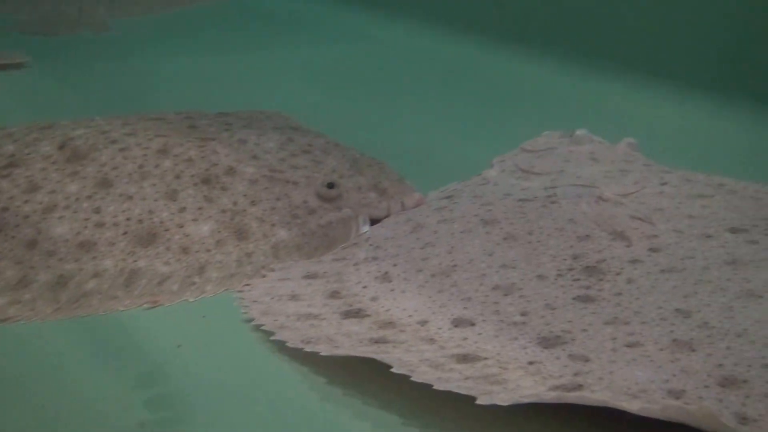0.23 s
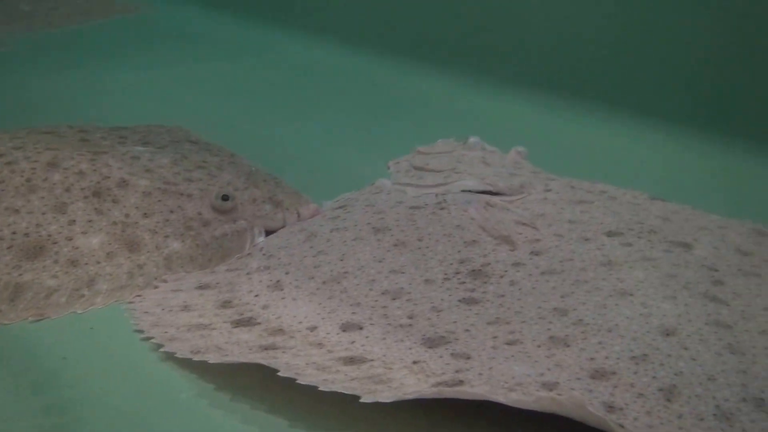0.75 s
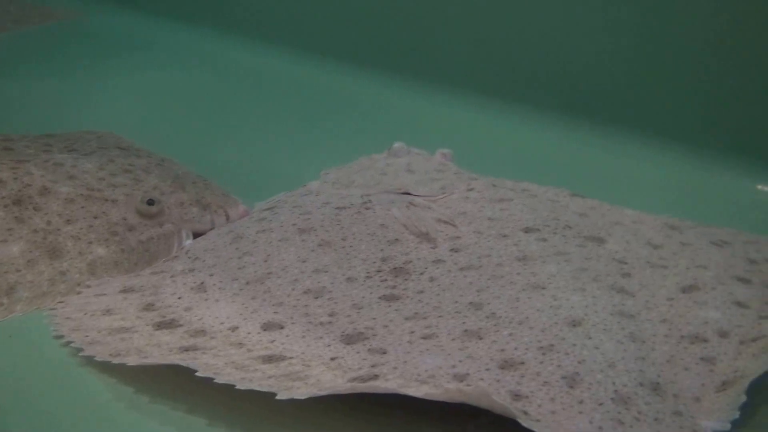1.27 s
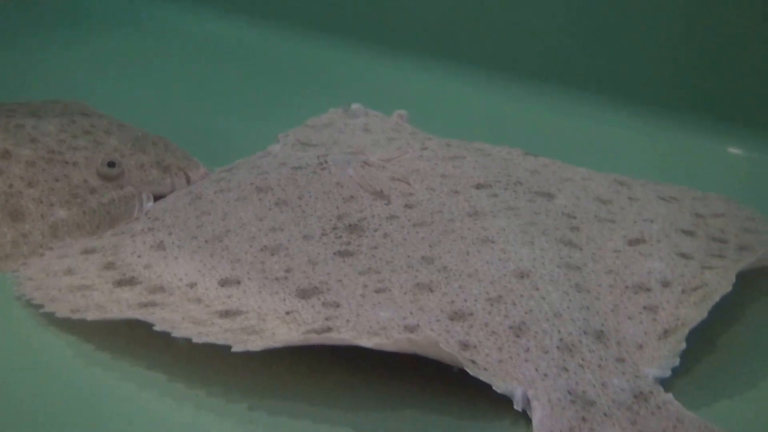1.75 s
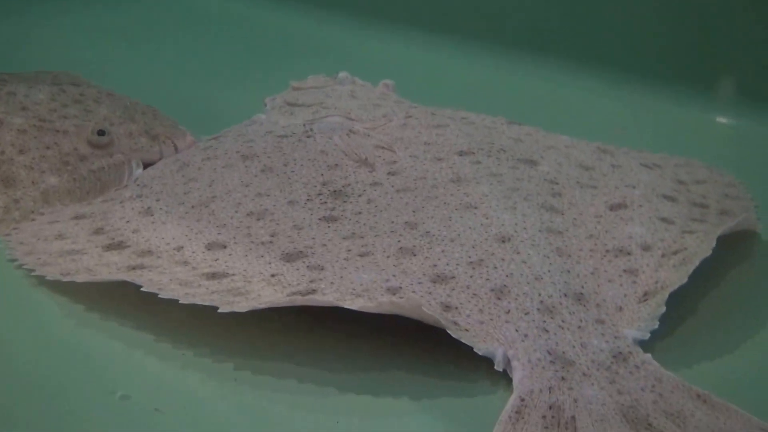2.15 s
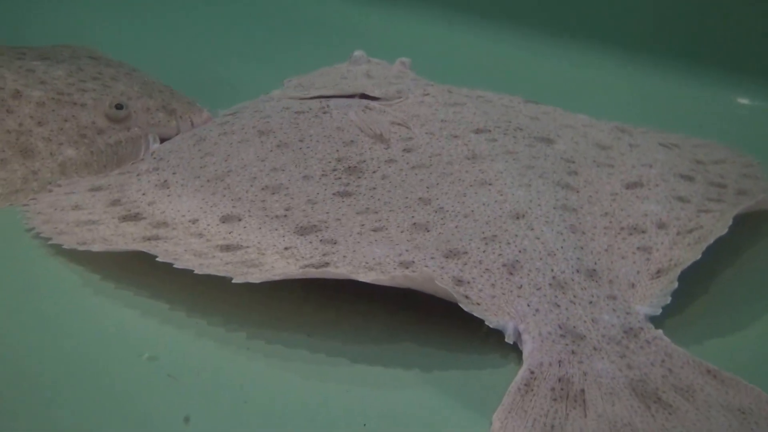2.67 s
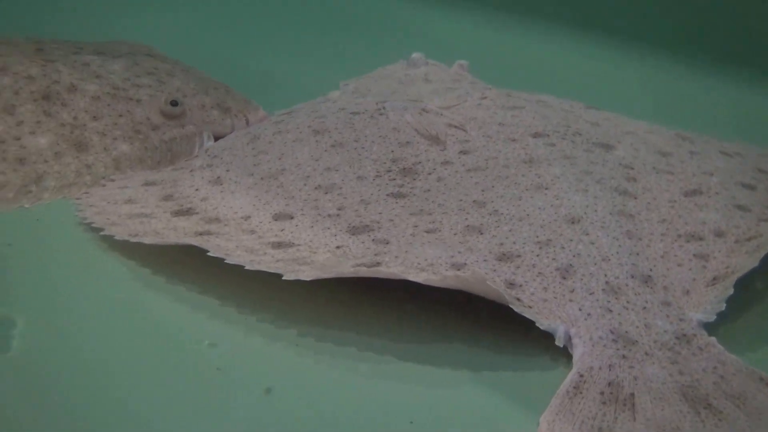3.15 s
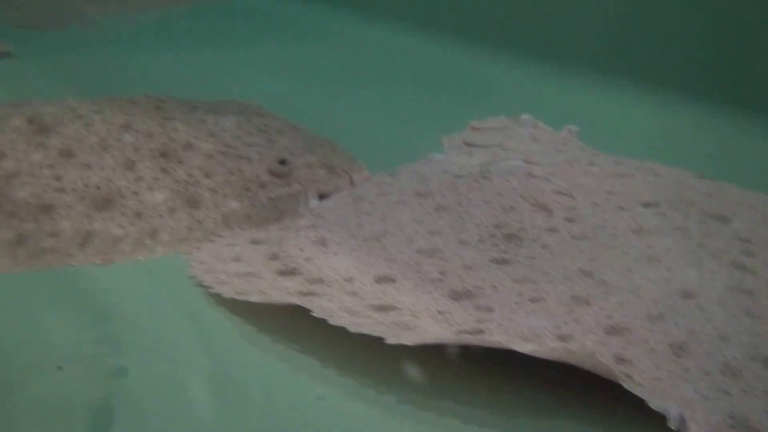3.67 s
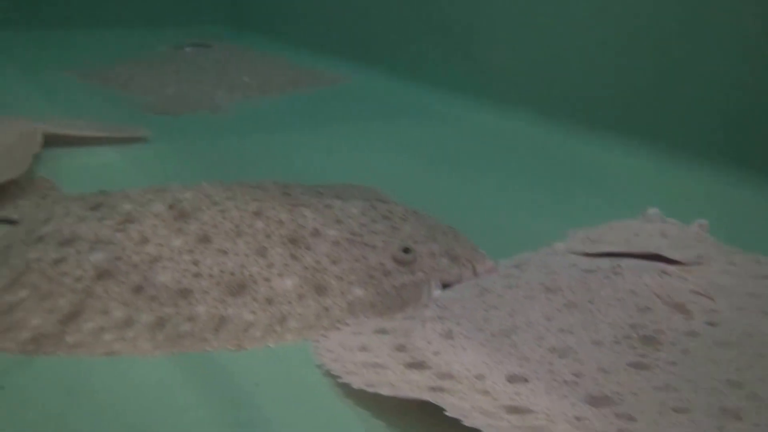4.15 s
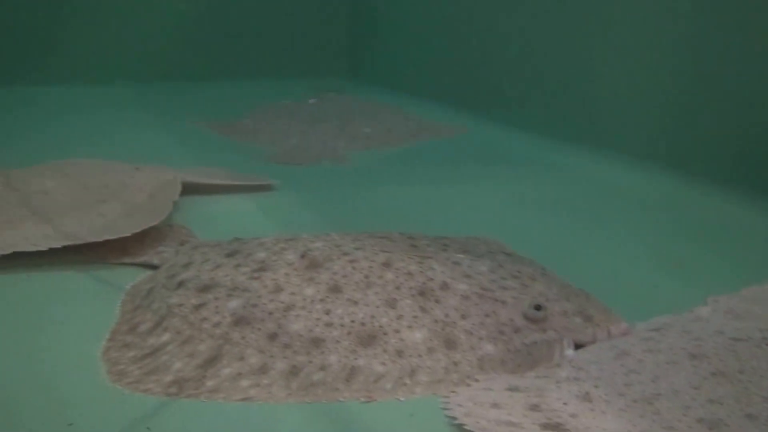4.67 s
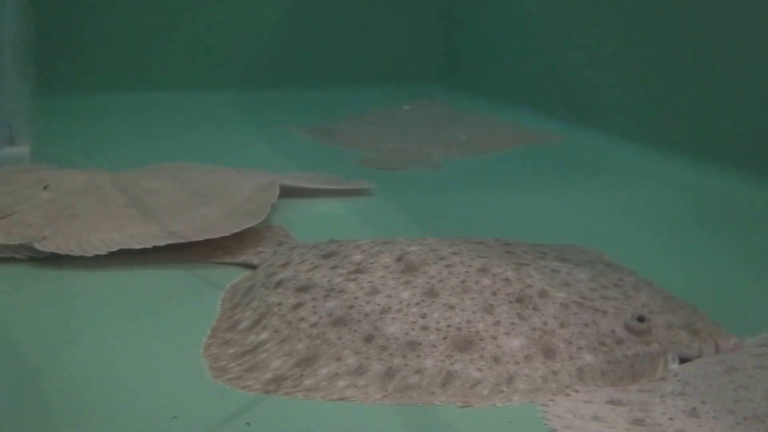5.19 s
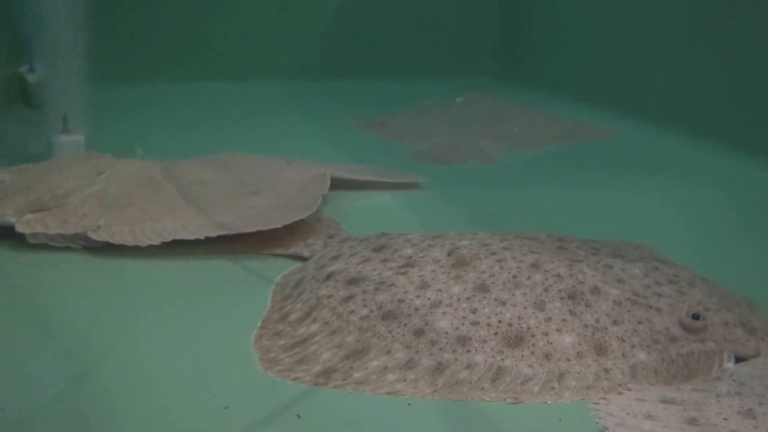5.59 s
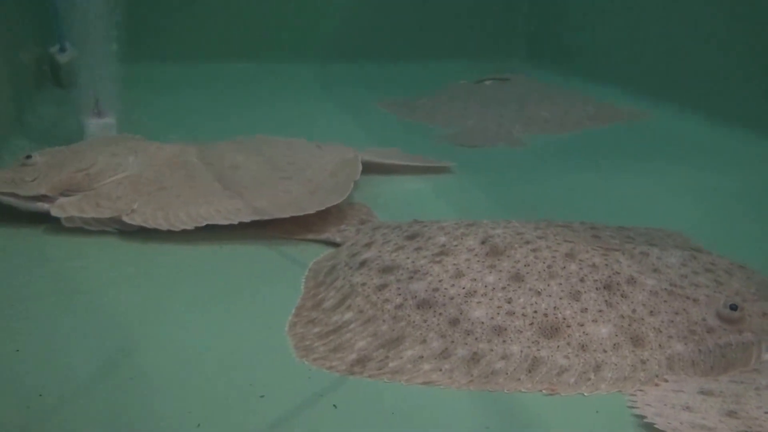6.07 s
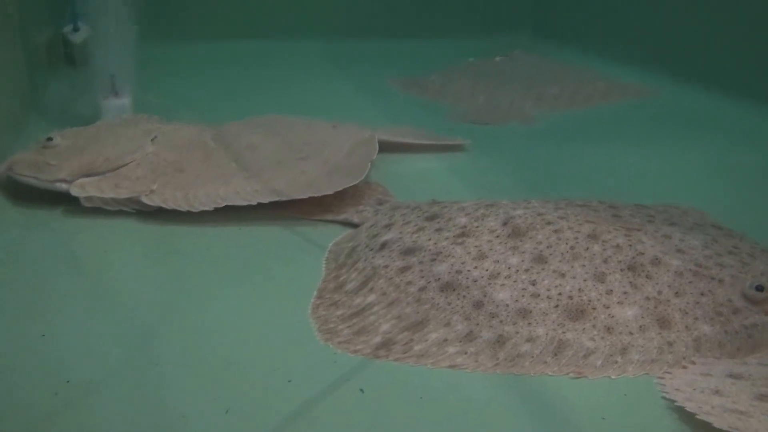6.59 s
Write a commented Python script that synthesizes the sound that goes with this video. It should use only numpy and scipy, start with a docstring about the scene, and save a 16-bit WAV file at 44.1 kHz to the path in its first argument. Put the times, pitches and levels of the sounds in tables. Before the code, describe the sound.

A close, nearly mono indoor sound beside a fish tank. Throughout, a pump hums at a low, slightly wavering pitch within a hollow drone, over lumpy deep rumble and churning water. A strong surge opens the scene and drops within 0.1 s; dull knocks strike the tank wall up to about 1.3 s, some harder. Faint distant water brightens into a short gush at 1.4 s. Near the microphone, a lens drive hisses and ticks fifty times a second; a thin whirr enters around 1.7 s. At 2.6 s it clicks and ticking stops, resuming with a softer click at 3.25 s. Flow and muffled thumps strengthen around 3.2-3.7 s, then the deep rumble gradually dies away. Scattered knocks continue. From 4.9 to 6.2 s faint high chirps flutter rapidly. Churning surges near 6.1 s, then slackens as the brighter stream swells by 6.6 s and remains to the end.

```python
"""Beside the fish tanks

A circulation pump hums in wavering sine tones; one surging flow drives noise that drones and rumbles, pulses
that churn, and dull knocks against the resonant tank wall. Running water, shaped noise, washes faintly further
off and twice swells to a brighter gush. Close to the microphone a camera's lens drive hisses through the casing
and ticks fifty times a second, pauses between two clicks, whirrs, and later chirps once a frame."""
import sys
import numpy as np
from scipy import signal
from scipy.fft import rfft, irfft
from scipy.io import wavfile

SR = 44100
rng = np.random.default_rng(int(sys.argv[2]) if len(sys.argv) > 2 else 0)


def output_pcm(signal):
    """Save a mono or channel-first signal as 16-bit PCM at the path in sys.argv[1].

    Samples are clipped to [-1, 1] before scaling.
    """
    pcm = np.clip(np.atleast_2d(signal).T, -1, 1) * 32767
    wavfile.write(sys.argv[1], SR, np.round(pcm).astype(np.int16))


N = 301203
TIME = np.arange(N) / SR   # s

# pump tones: (multiple of the shaft speed, rms level before wavering [dB])
PUMP_TONES = [(1, -48.5), (9, -44.5), (12, -36.5), (18, -54.5)]
SHAFT_HZ = 24.15

# strength of the flow past the tank: (time [s], level [dB])
FLOW_STRENGTH = [(0.0, -20.5), (0.11, -40.5), (0.46, -34.5), (0.55, -40), (1.25, -44), (1.5, -39),
                 (2.38, -46.5), (3.29, -35.5), (3.37, -34), (3.63, -32.5), (4.43, -37.5), (4.75, -33.5),
                 (5.71, -36.5), (6.11, -29), (6.83, -43)]
REFERENCE_FLOW_DB = -32   # the flow at which the levels below apply
LUMP_DB, LUMPS_HZ = 2.5, 12   # the water gurgles in uneven lumps: spread, corner of the drift
# each water sound: level at the reference flow [dB], and the dB it gains per dB of flow
DRONE_DB, DRONE_FOLLOWS = -30.5, 0.14
RUMBLE_DB, RUMBLE_FOLLOWS = -30.5, 0.69
CHURN_DB, CHURN_FOLLOWS = -29, 1.29
RUMBLE_FADES_S, RUMBLE_FADE_DB_PER_S = 3.36, 6.5   # the deep rumble dies away
WASH_DB = -53   # far running water

# relative spectrum of the tank's drone: (frequency [Hz], density [dB per Hz])
DRONE_SPECTRUM = [(60, -36), (130, -14.5), (190, -10.5), (235, -6.5), (290, 1.5), (345, -7), (430, -13),
                  (520, -20), (620, -27), (800, -34), (1200, -68.5)]
# relative spectrum of the deep rumble: (frequency [Hz], density [dB per Hz])
RUMBLE_SPECTRUM = [(8, 4.5), (20, 1.5), (36, -4), (55, 4), (100, -2.5), (170, -4.5), (300, -20),
                   (700, -67.5)]
# relative spectrum of the far wash: (frequency [Hz], density [dB per Hz])
WASH_SPECTRUM = [(300, -15.5), (600, -9), (880, -3.5), (1100, 2), (1400, -2.5), (1750, -4), (2000, -13),
                 (2550, -16), (3000, -18), (4200, -55), (9000, -60.5)]
# relative spectrum of the brighter stream: (frequency [Hz], density [dB per Hz])
GUSH_SPECTRUM = [(150, -28), (280, -13), (350, 4.5), (430, -10.5), (560, -19.5), (950, -43), (1350, -22.5),
                 (1900, -39.5), (2400, -36), (3500, -74)]

# modes of the tank wall: (frequency [Hz], width before damping [Hz], relative level [dB])
WALL_MODES = [(149, 130, -14.5), (271.8, 103.6, -1)]
# resonances of the camera casing: (frequency [Hz], width [Hz], relative level [dB])
CASING_MODES = [(3416, 210, 7.5), (4910, 310, 7), (5830, 360, 8), (6850, 850, 5), (9840, 1800, -13)]

TICK_HZ, FIRST_TICK_S = 50.005, 0.0185
TICK_BEFORE_DB, TICK_AFTER_DB = -52.5, -54   # mean first-contact peak before and after the pause
# the lens drive stops, then starts again, each time with a click: (time [s], first-contact peak [dB])
DRIVE_CLICKS = [(2.6082, -30.5), (3.2483, -36.5)]
(STOP_S, _), (RESTART_S, _) = DRIVE_CLICKS

# the loud knocks on the tank: (time [s], push before a common trim [dB], hardness [0-1])
LOUD_KNOCKS = [(.0593, -6, 0.55), (.207, -4, 0.68), (.3158, -14, 0.1), (.5601, -5, 0.3), (.9706, -8.5, 0.1),
               (.9844, -14, .2), (1.2573, -4.5, 1), (3.229, -10.5, 0.3), (3.259, -11, 0.2), (3.2976, -8, 0),
               (3.442, -9.5, 0), (3.495, -4.5, 0.08), (3.6343, -11.5, 0.4), (3.916, -10.5, 0.1),
               (4.166, -11, 0.17), (4.307, -10.5, 0), (4.518, -13.5, 0.5), (4.692, -15, 0.1),
               (5.024, -14, 0.2), (5.194, -10.5, 0.4), (5.510, -10.5, 0.3), (5.98, -15, 1),
               (6.21, -13, 0.3)]
# lesser knocks at the reference flow; they thin out and weaken as it slackens
BUMPS_PER_S, BUMP_DB, BUMP_SPREAD_DB = 13, -16.5, 0.3

# swells of the brighter stream: (time of the crest [s], level [dB], rise [dB/s], fall [dB/s])
GUSH_SWELLS = [(1.4, -35.5, 70, 47), (6.601, -31.5, 8.5, -1)]

# resonances of the motor's whirr: (frequency [Hz], width [Hz], relative level [dB])
WHIRR_MODES = [(2575, 69, 4.5), (2964, 120, -0.5), (3320, 220, 0), (3620, 150, -9)]
WHIRR_FROM_S, WHIRR_RISE_S, WHIRR_DB = 1.72, 0.29, -68.5

# partials of the motor's chirp: (multiple of its pitch, relative level [dB])
CHIRP_PARTIALS = [(1, -1.5), (2, -15), (3, -8.5), (4, -25)]
CHIRP_FROM_S, CHIRP_TO_S, CHIRP_FADE_S, CHIRP_DB = 4.87, 6.2, 0.18, -55.5
FRAMES_PER_S = 25

# stereo width, the side level of a late copy: (frequency [Hz], side level [dB])
STEREO_WIDTH = [(30, -39.5), (120, -31), (300, -36.5), (550, -40.5), (1000, -16.5), (2200, -20),
                (4000, -15), (7000, -44.5), (13000, -25.5)]
CUTOFF_HZ = 15700


def from_db(db):
    """Amplitude factor of a level in dB."""
    return 10 ** (np.asarray(db) / 20)


def rms_one(x):
    """Scale a signal to rms 1."""
    return x / np.sqrt(np.mean(x ** 2) + 1e-20)


def coloured(x, spectrum):
    """Filter a sound by a (frequency, dB) table, interpolated over log frequency."""
    hz, db = np.transpose(spectrum)
    bins = np.maximum(np.fft.rfftfreq(N, 1 / SR), 1)
    gain = from_db(np.interp(np.log(bins), np.log(hz), db))
    return irfft(rfft(x) * gain, N)


def water_noise(spectrum):
    """Water as steady noise of a given colour; rms 1."""
    return rms_one(coloured(rng.standard_normal(N), spectrum))


def drift(corner_hz):
    """Smooth random wandering with spread 1: noise through two equal poles, every 100th sample."""
    r = np.exp(-200 * np.pi * corner_hz / SR)
    noise = rng.standard_normal(N // 100 + 1002)
    slow = signal.lfilter([1], [1, -2 * r, r * r], noise)[1000:]   # drop the settling
    return np.interp(np.arange(N) / 100, np.arange(len(slow)), rms_one(slow))


def cut(x, hz, kind, order=2):
    """Butterworth low- or high-pass."""
    return signal.sosfilt(signal.butter(order, hz, kind, fs=SR, output="sos"), x + 1e-18)


def resonate(x, hz, width):
    """One resonance, gain 1 on top."""
    r = np.exp(-np.pi * width / SR)
    zeros = np.array([1, 0, -1]) * (1 - r * r) / 2
    poles = [1, -2 * r * np.cos(2 * np.pi * hz / SR), r * r]
    return signal.lfilter(zeros, poles, x + 1e-18)


def impulses(times, sizes):
    """Single-sample pushes at the given times."""
    out = np.zeros(N)
    places = np.clip(np.round(times * SR).astype(int), 0, N - 1)
    np.add.at(out, places, sizes)
    return out


def unit_height(body, push):
    """Drive a body, scaled so that a unit push peaks at 1."""
    return body(push) / np.abs(body(signal.unit_impulse(SR // 10))).max()


def fade_in(start_s, length_s):
    """A gain that rises from 0 to 1 and stays."""
    return np.clip((TIME - start_s) / length_s, 0, 1)


def pump(waver_db=2.0, slip=0.00328):
    """Shaft and impeller tones: multiples of the shaft speed, wavering a little with the load."""
    turn = 2 * np.pi * SHAFT_HZ * np.cumsum(1 + slip * drift(1.7)) / SR
    hum = np.zeros(N)
    for multiple, db in PUMP_TONES:
        peak = np.sqrt(2) * from_db(db + waver_db * drift(6.7))
        hum += peak * np.sin(multiple * turn + rng.uniform(0, 2 * np.pi))
    return hum


def tank_drone(flow_db):
    """The tank drones as narrow noise, its level fluttering and only slightly following the flow."""
    level_db = DRONE_DB + DRONE_FOLLOWS * flow_db + 0.89 * drift(11.0)
    return from_db(level_db) * water_noise(DRONE_SPECTRUM)


def deep_rumble(flow_db, lumps_db):
    """Low, lumpy noise that follows the flow and later dies away."""
    dying_db = RUMBLE_FADE_DB_PER_S * np.maximum(TIME - RUMBLE_FADES_S, 0)
    level_db = RUMBLE_DB + RUMBLE_FOLLOWS * flow_db - dying_db + lumps_db
    return from_db(level_db) * water_noise(RUMBLE_SPECTRUM)


def far_wash():
    """Running water further off: faint noise with a slightly unsteady level."""
    return from_db(WASH_DB + 0.53 * drift(7.9)) * water_noise(WASH_SPECTRUM)


def wall(push, soft_hz=125, damping=1):
    """Water cushions every push before the wall rings with it."""
    push = cut(push, soft_hz, "low")
    ring = 0
    for hz, width, db in WALL_MODES:
        once = resonate(push, hz, width * damping)
        ring = ring + from_db(db) * resonate(once, hz, width * damping)
    return ring


def churning(flow_db, lumps_db, pulses_per_s=160, spread_db=4.0, slosh_db=-1.5):
    """Many small pulses of either sign ring the wall and shove the water beneath it."""
    sizes = from_db(spread_db * np.minimum(rng.exponential(1, N), 3)) * rng.choice([-1, 1], N)
    pulses = sizes * (rng.random(N) < pulses_per_s / SR)
    slosh = cut(cut(pulses, 129.6, "low", order=4), 44, "high", order=4)
    churn = rms_one(rms_one(wall(pulses)) + from_db(slosh_db) * rms_one(slosh))
    return from_db(CHURN_DB + CHURN_FOLLOWS * flow_db + lumps_db) * churn


def casing(push):
    """The camera's small, bright resonances, alternating in sign."""
    return sum((-1) ** k * from_db(db) * resonate(push, hz, width)
               for k, (hz, width, db) in enumerate(CASING_MODES))


def lens_hiss(casing_db=-64, pause_drop_db=1.0, floor_db=-71, floor_top_hz=12000):
    """Noise hisses in the casing, sinking while the drive pauses, over a soft low-passed floor."""
    paused = (TIME > STOP_S) & (TIME < RESTART_S)
    in_casing = rms_one(casing(rng.standard_normal(N)))
    floor = cut(from_db(floor_db) * rng.standard_normal(N), floor_top_hz, "low", order=1)
    return from_db(casing_db - pause_drop_db * paused) * in_casing + floor


def lens_whine(pitch_hz=9600, width_hz=420, level_db=-83):
    """A thin, breathy whine, noise through two resonances, that ends when the drive stops."""
    once = resonate(rng.standard_normal(N), pitch_hz, width_hz)
    whine = rms_one(resonate(once, pitch_hz, width_hz))
    return from_db(level_db) * whine * (TIME < STOP_S)


def rattle(s, db, low_hz, direct_db, top_hz=10500, bounce_s=0.00064, bounce=0.23, count=4):
    """Hard, thin contacts in the casing, each bouncing a few times, unevenly."""
    late = bounce_s * (np.arange(count) + rng.uniform(-.3, .3, (len(s), count)))
    sizes = np.outer(from_db(db), bounce ** np.arange(count))
    pushes = impulses((s[:, None] + late).ravel(), sizes.ravel())

    def contact(push):
        heard = casing(push) + from_db(direct_db) * push
        return cut(cut(heard, low_hz, "high", order=8), top_hz, "low")
    return unit_height(contact, pushes)


def lens_ticks(scatter_db=2.4):
    """Each step of the lens drive ticks, except in its pause; stopping and starting give fuller clicks."""
    steps = np.arange(FIRST_TICK_S, TIME[-1], 1 / TICK_HZ)
    mean_db = np.where(steps < STOP_S, TICK_BEFORE_DB, TICK_AFTER_DB)
    step_db = mean_db + scatter_db * rng.standard_normal(len(steps))
    moving = (steps < STOP_S) | (steps > RESTART_S)
    ticks = rattle(steps[moving], step_db[moving], low_hz=5760, direct_db=-26.5)
    clicks = rattle(*np.transpose(DRIVE_CLICKS), low_hz=4600, direct_db=-17)
    return ticks + clicks


def knocks(rows, trim_db=-0.2, edge_db=-17, edge_low_hz=450, edge_top_hz=1100, edge_lag_s=0.0014):
    """Pressure pulses rock the wall; hard ones ring longer and have a rounded edge as they peak."""
    s, db, hardness = np.transpose(rows)
    hard, soft = from_db(db) * hardness, from_db(db) * (1 - hardness)

    def rounded(push):
        return cut(resonate(push, edge_low_hz, edge_low_hz), edge_top_hz, "low", order=6)
    ring = unit_height(lambda push: wall(push, soft_hz=125, damping=0.96), impulses(s, hard))
    thud = unit_height(lambda push: wall(push, soft_hz=131, damping=1.47), impulses(s, soft))
    edge = unit_height(rounded, impulses(s + edge_lag_s, hard))
    return from_db(trim_db) * (ring + thud + from_db(edge_db) * edge)


def bumps(flow_db, thinning=1.3, follows=0.56, hardness=0.15, count=200):
    """Rows for lesser knocks at random moments, more and stronger in a strong flow; at most `count`."""
    when, chance = rng.random((count, 2)).T
    s = when * TIME[-1]
    flow = np.interp(s, TIME, flow_db)
    db = BUMP_DB + follows * flow + BUMP_SPREAD_DB * rng.standard_normal(count)
    kept = chance < BUMPS_PER_S * from_db(thinning * flow) * TIME[-1] / count
    return np.c_[s, db, np.full(count, hardness)][kept]


def gush():
    """The brighter stream rises to each crest; a negative fall lets it creep on upwards afterwards."""
    swell = np.zeros(N)
    for s, db, rise, fall in GUSH_SWELLS:
        below_db = np.maximum(rise * (s - TIME), fall * (TIME - s))
        swell += from_db(db - below_db)
    return swell * water_noise(GUSH_SPECTRUM)


def lens_whirr():
    """The lens motor's whirr, rubbing noise through narrow resonances, sets in and stays."""
    rub = rng.standard_normal(N)
    whirr = rms_one(sum(from_db(db) * resonate(rub, hz, width) for hz, width, db in WHIRR_MODES))
    return from_db(WHIRR_DB) * fade_in(WHIRR_FROM_S, WHIRR_RISE_S) * whirr


def lens_chirps(pitch_hz=2194, duty=0.51, scatter_db=3.0):
    """The motor runs for part of every frame, starting afresh each time with a strength of its own."""
    frame, within = np.divmod(TIME * FRAMES_PER_S + .5, 1)
    start, strength = rng.standard_normal((int(frame[-1]) + 1, 2))[frame.astype(int)].T
    running = np.sin(np.pi * np.minimum(within / duty, 1)) ** 1.4
    turn = 2 * np.pi * pitch_hz * TIME + 0.6 * start
    tone = sum(from_db(db) * np.sin(k * turn) for k, db in CHIRP_PARTIALS)
    active = fade_in(CHIRP_FROM_S, CHIRP_FADE_S) - fade_in(CHIRP_TO_S - CHIRP_FADE_S, CHIRP_FADE_S)
    return from_db(CHIRP_DB + scatter_db * strength) * active * running * tone


def widen(x):
    """A faint, filtered copy, 11.3 ms late, is added left and subtracted right for a slight stereo width."""
    lag = round(.0113 * SR)
    side = coloured(np.r_[np.zeros(lag), x[:-lag]], STEREO_WIDTH)
    return x + side * [[1], [-1]]


def scene():
    """Pump, water and camera together; the flow drives churning, knocking, drone and rumble."""
    flow_s, strength_db = np.transpose(FLOW_STRENGTH)
    flow_db = np.interp(TIME, flow_s, strength_db) - REFERENCE_FLOW_DB
    lumps_db = LUMP_DB * drift(LUMPS_HZ)   # shared by rumble and churning
    tank = pump() + tank_drone(flow_db) + deep_rumble(flow_db, lumps_db) + churning(flow_db, lumps_db)
    tank = tank + knocks(LOUD_KNOCKS) + knocks(bumps(flow_db))
    running_water = far_wash() + gush()
    camera = lens_hiss() + lens_whine() + lens_ticks() + lens_whirr() + lens_chirps()
    return widen(tank + running_water + camera)


def record(dry):
    """A steep elliptic low-pass cuts the top."""
    return signal.sosfilt(signal.ellip(12, .1, 80, CUTOFF_HZ, fs=SR, output="sos"), dry)


dry = scene()
out = record(dry)
output_pcm(out)
```